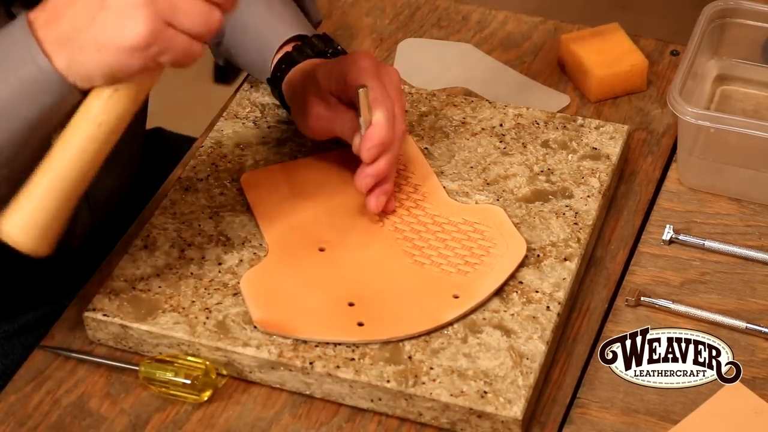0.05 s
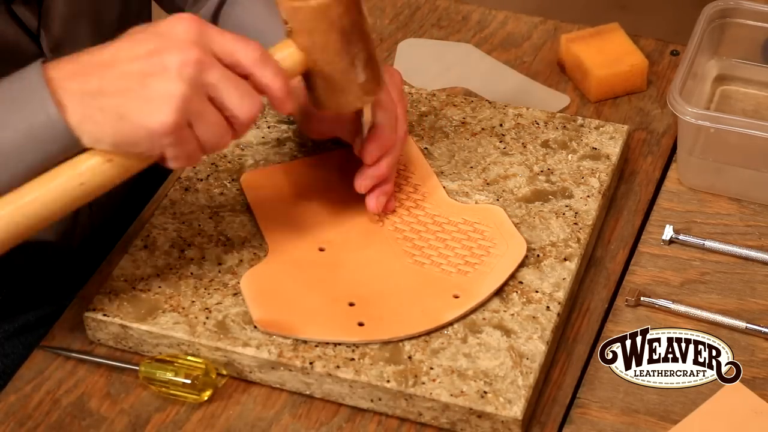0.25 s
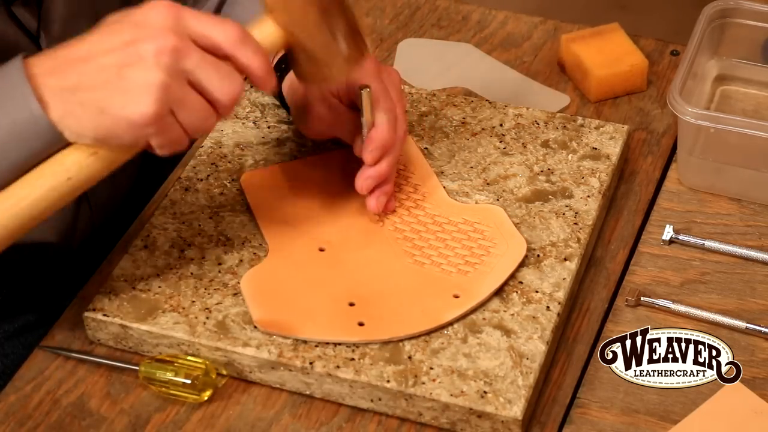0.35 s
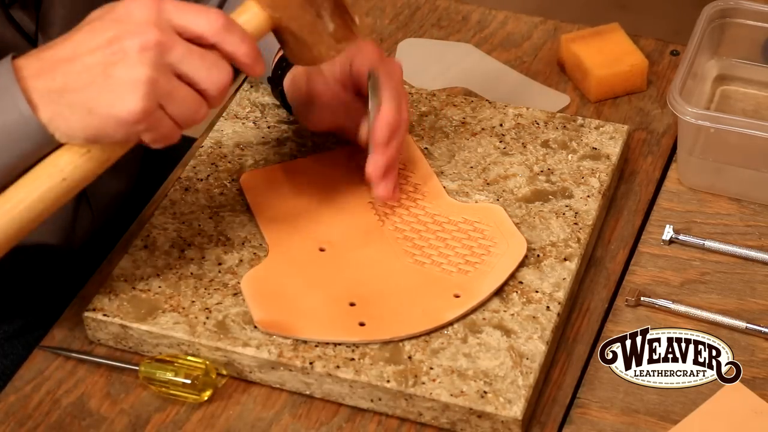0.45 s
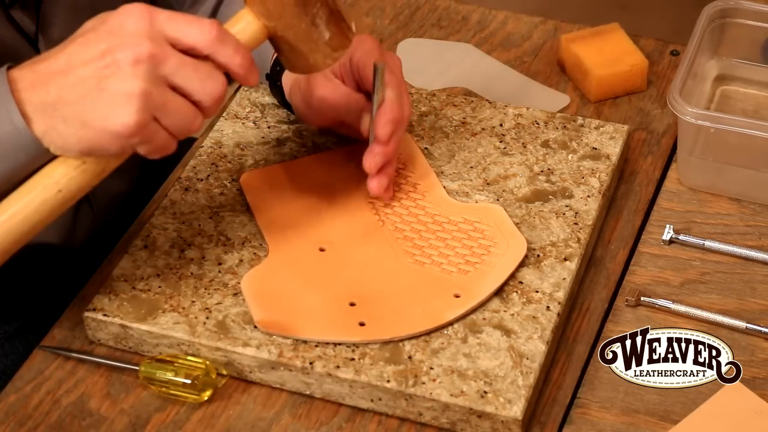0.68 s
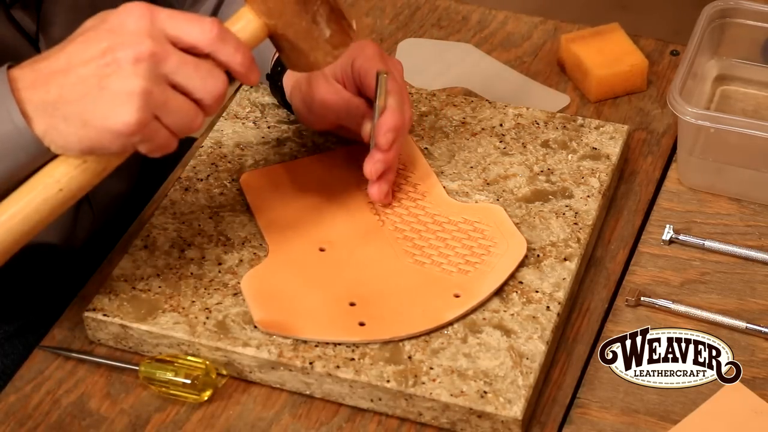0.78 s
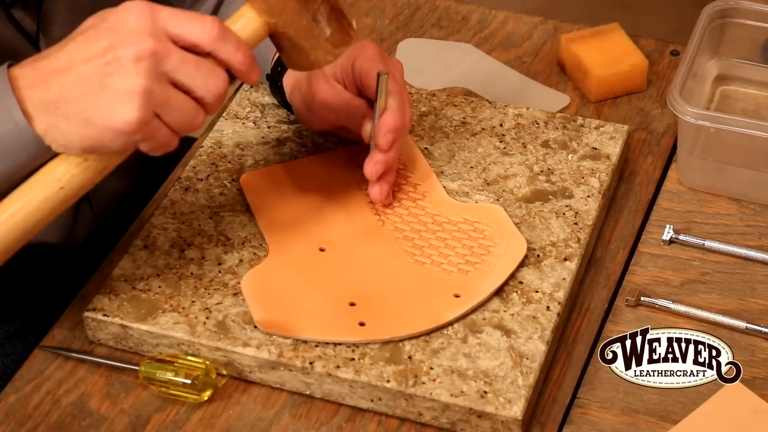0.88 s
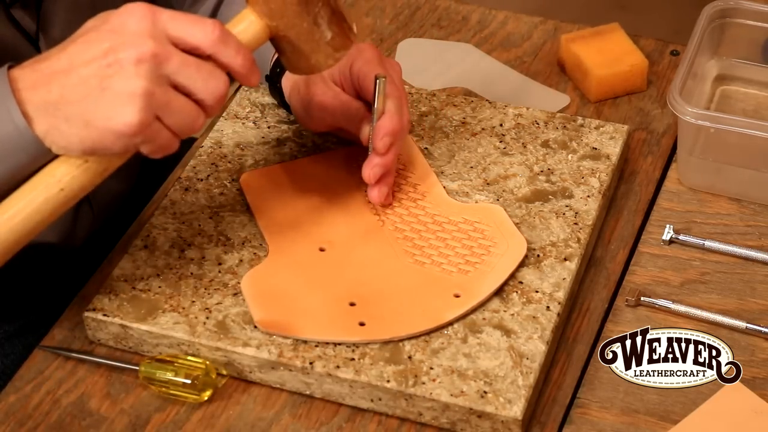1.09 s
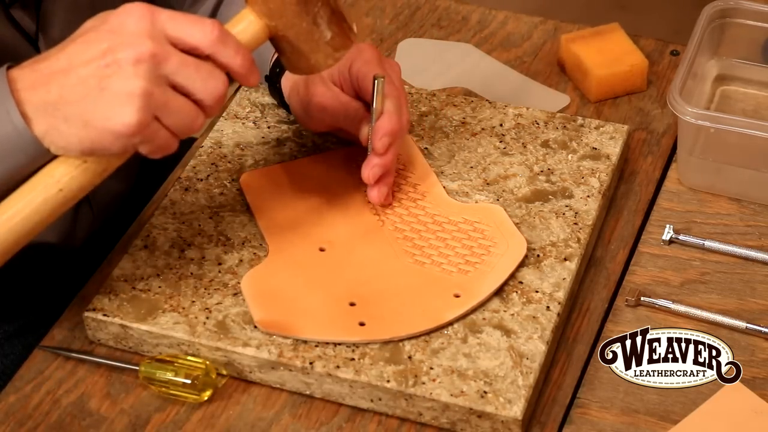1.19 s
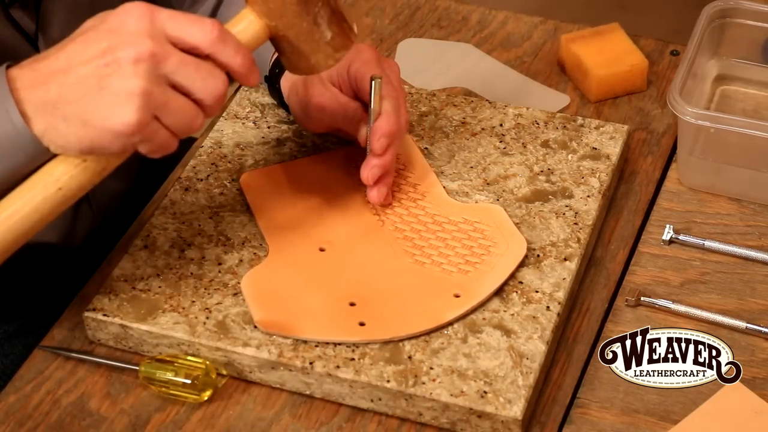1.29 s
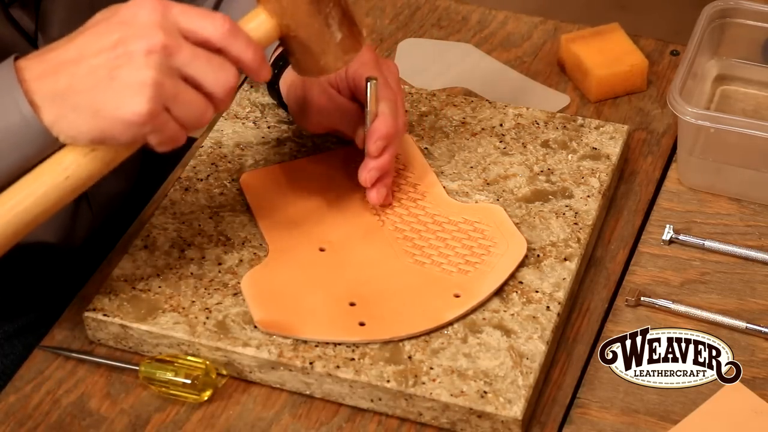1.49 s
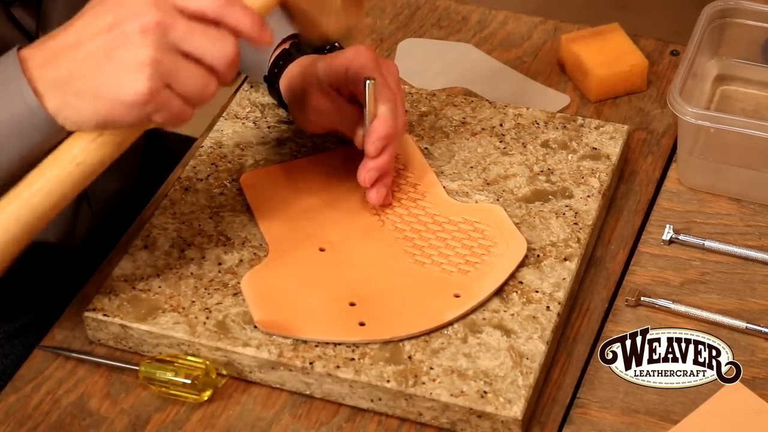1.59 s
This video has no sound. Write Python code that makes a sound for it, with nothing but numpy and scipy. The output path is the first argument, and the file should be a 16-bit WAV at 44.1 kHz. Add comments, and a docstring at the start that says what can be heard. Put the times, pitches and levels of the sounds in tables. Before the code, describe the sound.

A mallet strikes a metal stamp on leather once, a sharp knock in a small workshop.

```python
"""A rawhide mallet strikes a steel stamp once, on leather over a stone slab. Mallet, stamp and slab ring as
damped modes with a short crack; a softer, duller knock follows shortly after. The small workshop rings on
briefly, longest in the bass; sleeve and leather rustle faintly. The building rumbles. A small recorder close by
clips the blow, hisses and whines thinly."""
import sys
import numpy as np
from scipy import signal
from scipy.fft import rfft, irfft, next_fast_len
from scipy.io import wavfile
from scipy.ndimage import uniform_filter1d, map_coordinates

SR = 44100
rng = np.random.default_rng(int(sys.argv[2]) if len(sys.argv) > 2 else 0)


def unload_audio(sound):
    """Save the sound as a 16-bit wav file, at the path given as the first command line argument."""
    columns = np.transpose(np.atleast_2d(sound))
    # keep every value between -1 and 1, then stretch to whole-number steps
    steps = np.round(np.clip(columns, -1, 1) * 32767)
    wavfile.write(sys.argv[1], SR, steps.astype(np.int16))


N = 72765
TIME_S = np.arange(N) / SR

# blow, then a softer, duller knock: start_s, gain_db
IMPACTS = [(0.231, 3.5), (0.2775, -24.5)]
# mallet head, stamp and slab: pitch_hz, level_db, t60_s
MODES = [(130, -21.5, .03), (201, -16, .025), (345, -6.5, 0.01218), (465.1, -1.5, 0.014),
         (953, -16.5, 0.014), (1455, -16, .025), (1850, -18, 0.025), (2607, -2, .006), (2930, -0.5, 0.01),
         (3600, -7.5, .014), (3800, -22.5, .04), (4810, 2.5, .005), (5160, 0, .004), (6140, -11, .007),
         (7200, -16, .006), (9600, -3, .004), (11700, -2.5, .004)]
# reflections off bench and near walls: freq_hz, density_db
EARLY_SPECTRUM = [(40, -15.5), (200, -5.5), (450, -0.5), (700, -2.5), (1080, -15), (1460, -10),
                  (1900, -15.5), (2990, -11.5), (3740, -9.5), (4700, -14), (5560, -25), (6460, -19),
                  (10900, -29.5), (15000, -40.5)]
# their decay: freq_hz, t60_s
EARLY_DECAY = [(60, 0.04), (400, .06), (2000, 0.08), (5000, .05), (12000, .035)]
# room reverb, coloured by the modes: freq_hz, density_db
ROOM_SPECTRUM = [(15, -41.5), (25, -9), (100, -13), (180, -4), (260, -1.5), (340, -9.5), (475, -0.5),
                 (660, -4), (800, -10), (1140, -23.5), (1470, -15.5), (1800, -28), (2050, -21.5),
                 (2500, -27.5), (2950, -17), (3300, -28), (3750, -16.5), (4100, -25), (4600, -21.5),
                 (5200, -33), (5800, -39.5), (6400, -27), (7300, -36.5), (12000, -51), (16000, -79.5)]
# its decay: freq_hz, t60_s
ROOM_DECAY = [(30, 0.53), (100, .33), (250, 0.33), (500, 0.28), (1000, 0.26), (3000, 0.36), (7000, .25)]
# the room's low reverb: freq_hz, density_db
LOW_REVERB_SPECTRUM = [(12, -30), (28, 0), (60, -4.5), (120, -5.5), (350, -11), (700, -41.5)]
# its decay: freq_hz, t60_s
LOW_REVERB_DECAY = [(30, .8), (400, .7)]
# sleeve and leather: peak_s, rise_s, fall_s, level_db, centre_hz, width_oct
RUSTLE_PUFFS = [(0.005, 0.0092, 0.09, -70.5, 685, 2.3), (0.196, 0.0057, 0.024, -59.5, 880, 2),
                (0.207, .003, .004, -61, 3094, 0.2), (0.207, .01, .015, -67, 2491, 0.67),
                (0.45, 0.061, 0.21, -70.5, 870, 1.67), (0.555, 0.016, .025, -65, 2820, 0.46),
                (0.559, 0.019, 0.027, -65.5, 880, 1.75), (0.59, 0.018, .015, -67.5, 2000, 1.06),
                (1.518, 0.00059, .002, -57.5, 2898, 0.18)]
# whine overtones: harmonic_number
WHINE_HARMONICS = [7, 9, 11, 13, 15, 17, 19, 20, 21, 22, 23, 28, 29, 30, 31, 32, 33, 34, 35, 44, 46, 47, 48,
                   80, 81, 95, 96, 97]
# whine level per overtone: rms_db
WHINE_LEVELS_DB = [-90, -89, -89.5, -84.5, -76.5, -80, -88, -93, -89, -91.5, -90, -85, -85.5, -81, -85, -74,
                   -78.5, -84, -87, -95.5, -92, -93.5, -91.5, -92, -93, -90.5, -86, -89.5]
# dips in the whine: start_s, end_s
WHINE_DIPS = [(0.03, 0.102), (0.388, 0.46), (1.228, 1.30)]
# noise that comes with the whine: freq_hz, density_db
BUZZ_SPECTRUM = [(300, -7), (2000, 1), (4500, -2), (8000, -6), (15000, -7)]
# recorder hiss: freq_hz, density_db
HISS_SPECTRUM = [(100, -5.5), (300, -2), (700, -6.5), (1500, -9.5), (3000, -10), (8000, -12), (15600, -12)]
# building rumble: freq_hz, density_db
RUMBLE_SPECTRUM = [(12, -31), (20, -5), (49, -2), (87, -11), (168, -11), (400, -25), (900, -51.5)]


def strike(start_s, rise_s=.0003, slab_lag_s=.0003, slab_top_hz=800):
    """One impact: a crack plus damped modes of mallet head, stamp and slab."""
    x = crack(start_s)
    for pitch_hz, level_db, t60_s in MODES:
        is_slab = pitch_hz < slab_top_hz  # slab modes start late, swinging down first
        age_s = since(start_s + is_slab * slab_lag_s)
        envelope = amp(level_db - 60 * age_s / t60_s) * (1 - np.exp(-age_s / rise_s)) ** 2
        x = x + (-1) ** is_slab * envelope * np.sin(2 * np.pi * pitch_hz * age_s)
    return x


def crack(start_s, gain_db=-1.5, rise_s=.0004, t60_s=.004, top_hz=12900):
    """Contact noise: a short low-passed burst."""
    envelope = amp(gain_db - 60 * since(start_s) / t60_s) * onset(start_s, rise_s)
    return filtered(envelope * rng.standard_normal(N), lambda hz: 1 / (1 + (hz / top_hz) ** 8))


def mallet(dull_hz=900, low_cut_hz=150):
    """Hard blow, then a softer, duller knock."""
    (blow_s, blow_db), (second_s, second_db) = IMPACTS
    blow = amp(blow_db) * strike(blow_s)
    second = amp(second_db) * filtered(strike(second_s), lambda hz: 1 / (1 + 1j * hz / dull_hz) ** 2)
    return filtered(blow + second, lambda hz: highpass(hz, low_cut_hz) ** 2)


def workshop():
    """Fast reflections off near surfaces, then the room's reverb."""
    early = tail(EARLY_SPECTRUM, EARLY_DECAY, gain_db=-16.5, rise_s=.006)
    return early + tail(ROOM_SPECTRUM, ROOM_DECAY, gain_db=-25.5, rise_s=.02)


def low_reverb():
    """The room's low reverb, lingering after the blow."""
    return tail(LOW_REVERB_SPECTRUM, LOW_REVERB_DECAY, gain_db=-45.5, rise_s=.03)


def rustles(rough_db=1.5):
    """Sleeve and leather: short, rough puffs of band noise."""
    x = 0
    for peak_s, rise_s, fall_s, level_db, centre_hz, width_oct in RUSTLE_PUFFS:
        white = rng.standard_normal(N)
        band = filtered(white, lambda hz: np.exp(-.5 * (np.log2((hz + 1) / centre_hz) / width_oct) ** 2))
        slope_s = np.where(TIME_S < peak_s, rise_s, fall_s)
        envelope = np.exp(-((TIME_S - peak_s) / slope_s) ** 2)
        x = x + amp(level_db + rough_db * wobble(rate_hz=400)) * envelope * unit_rms(band)
    return x


def whine(base_hz=400 / 3, buzz_db=-77, dip_db=-9.5):
    """Steady electrical overtones and buzz, dipping together three times."""
    tones = sum(amp(rms_db) * np.sqrt(2) * np.sin(2 * np.pi * (k * base_hz * TIME_S + rng.random()))
                for k, rms_db in zip(WHINE_HARMONICS, WHINE_LEVELS_DB))
    in_dip = sum(1. * (TIME_S > start_s) * (TIME_S < end_s) for start_s, end_s in WHINE_DIPS)
    gain = amp(dip_db * uniform_filter1d(in_dip, size=200))
    return gain * (tones + amp(buzz_db) * noise(BUZZ_SPECTRUM))


def noise_floor(hiss_db=-68.5, rumble_db=-74, swing_db=1.5, low_hz=12, top_hz=15600):
    """Recorder hiss and whine over the building's wavering rumble."""
    rumble = amp(rumble_db + swing_db * wobble(rate_hz=6)) * noise(RUMBLE_SPECTRUM)
    hiss = amp(hiss_db) * noise(HISS_SPECTRUM)
    return filtered(hiss + whine() + rumble, lambda hz: (hz > low_hz) * (hz < top_hz))


def tail(spectrum, decay, gain_db, rise_s):
    """Diffuse noise after the blow; each band decays at its own rate."""
    blow_s = IMPACTS[0][0]
    hz, frame_s, bands = signal.stft(noise(spectrum), SR, nperseg=256, noverlap=224)
    decay_db = -60 * np.maximum(frame_s - blow_s, 0) / log_interp(decay, hz)[:, None]
    _, x = signal.istft(bands * amp(decay_db), SR, nperseg=256, noverlap=224)
    return amp(gain_db) * x[:N] * onset(blow_s, rise_s)


def noise(spectrum):
    """Coloured noise, rms 1."""
    return unit_rms(filtered(rng.standard_normal(N), lambda hz: amp(log_interp(spectrum, hz))))


def wobble(rate_hz):
    """Smooth random curve, rate_hz knots a second."""
    knots = rng.standard_normal(int(N * rate_hz / SR) + 4)
    return map_coordinates(knots, [TIME_S * rate_hz])


def filtered(x, response):
    """Zero-padded FFT filter with gain response(hz)."""
    size = next_fast_len(N + SR // 2)
    return irfft(rfft(x, size) * response(np.fft.rfftfreq(size, 1 / SR)), size)[..., :N]


def highpass(hz, corner_hz):
    return 1j * hz / (corner_hz + 1j * hz)


def log_interp(points, hz):
    freq_hz, values = np.transpose(points)
    return np.interp(np.log(hz + 1), np.log(freq_hz + 1), values)


def onset(start_s, rise_s):
    return 1 - np.exp(-(since(start_s) / rise_s) ** 2)


def since(start_s):
    return np.maximum(TIME_S - start_s, 0)


def amp(db):
    return 10 ** (np.asarray(db) / 20)


def unit_rms(x):
    return x / np.sqrt(np.mean(x ** 2) + 1e-20)


def scene():
    """Mono mix of all sources."""
    room = workshop()
    return (mallet() + room + low_reverb() + rustles() + noise_floor())[None]


def record(dry, hardness=8, low_cut_hz=25.2, top_hz=16460, edge_hz=600):
    """Recorder: clips at full scale, thins the deepest bass, limits the band."""
    clipped = dry / (1 + np.abs(dry) ** hardness) ** (1 / hardness)
    return filtered(
        clipped, lambda hz: highpass(hz, low_cut_hz) * np.clip((top_hz - hz) / edge_hz + .5, 0, 1) ** 2)


dry = scene()
out = record(dry)
unload_audio(out)
```